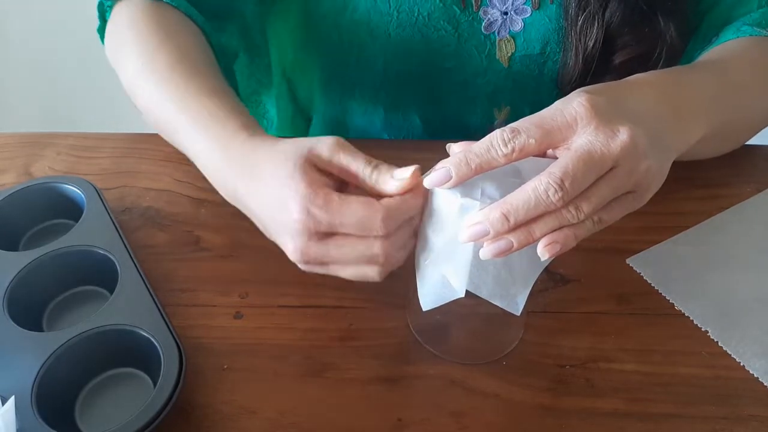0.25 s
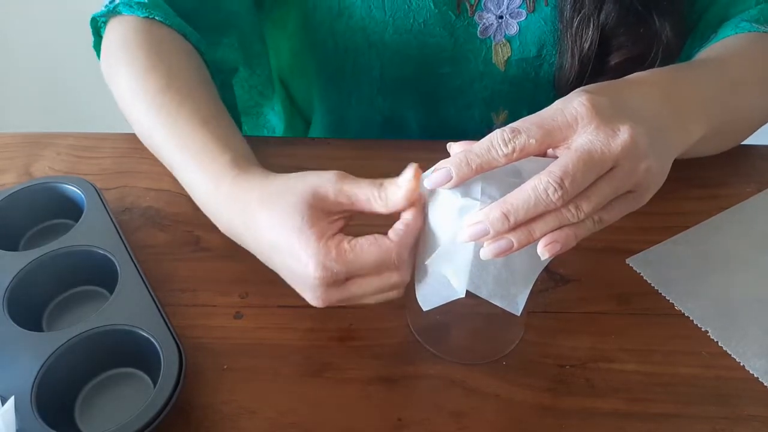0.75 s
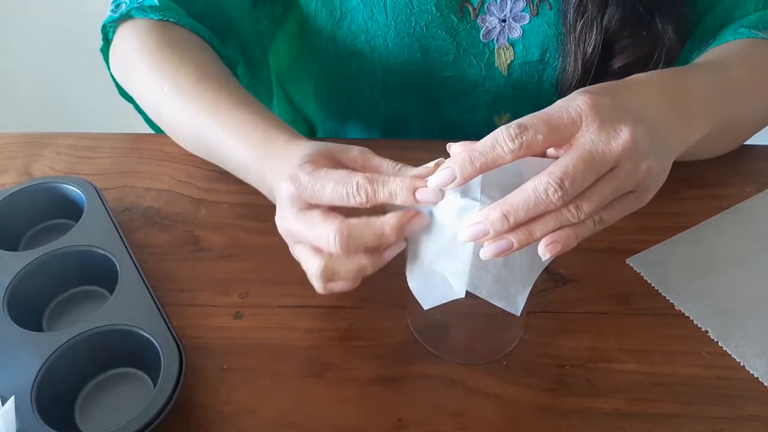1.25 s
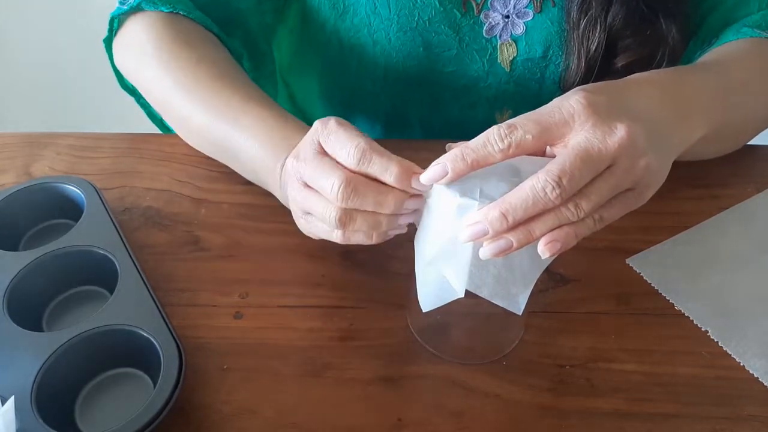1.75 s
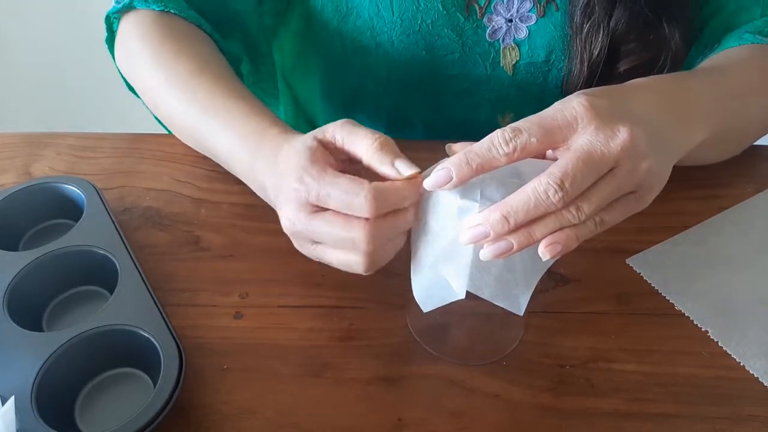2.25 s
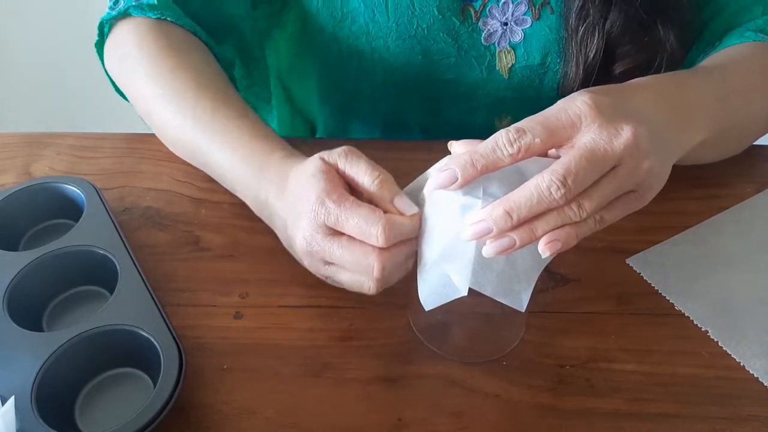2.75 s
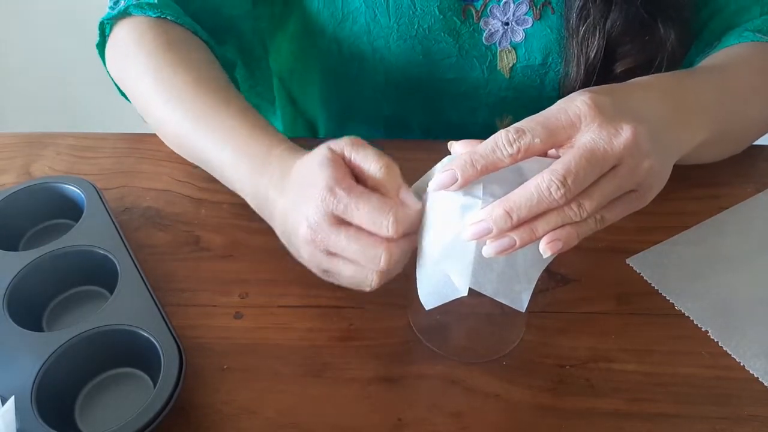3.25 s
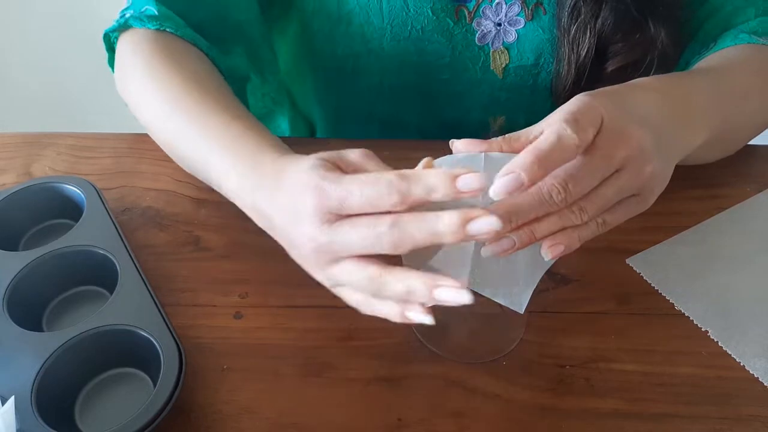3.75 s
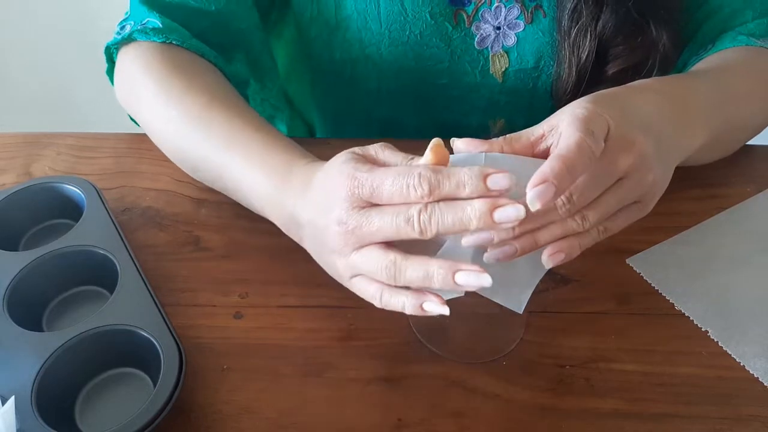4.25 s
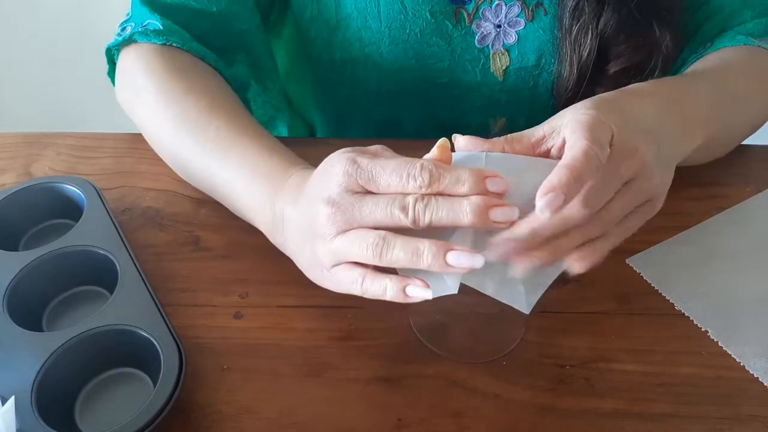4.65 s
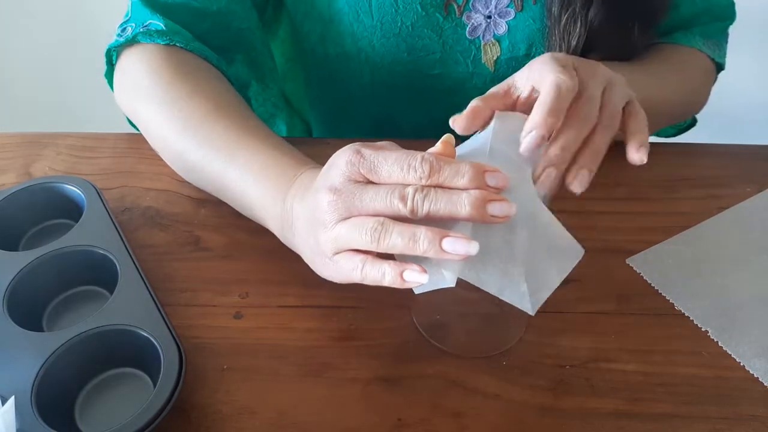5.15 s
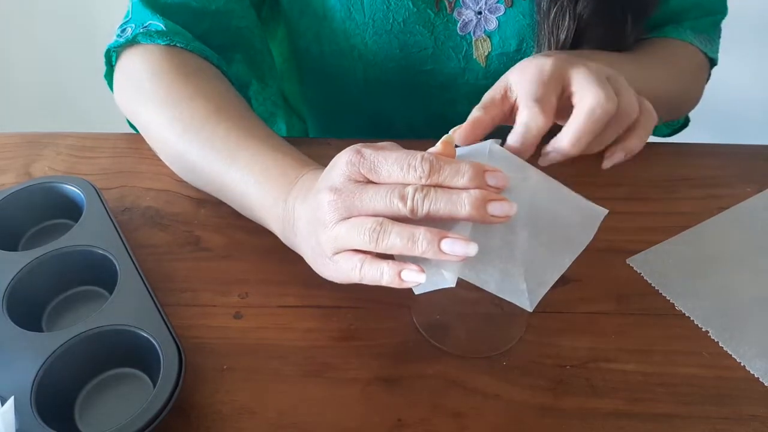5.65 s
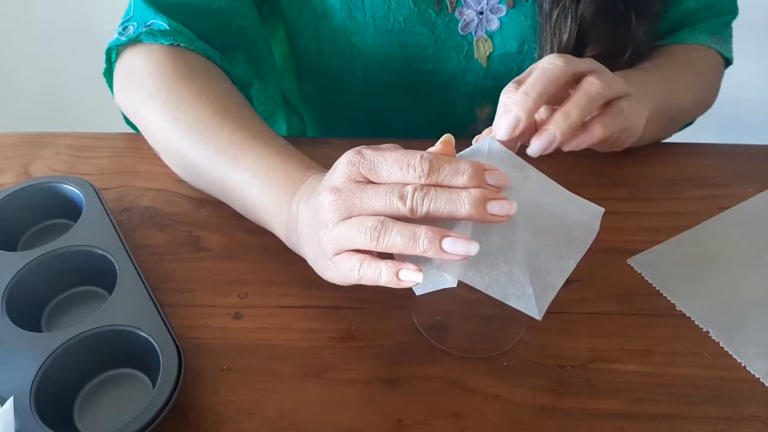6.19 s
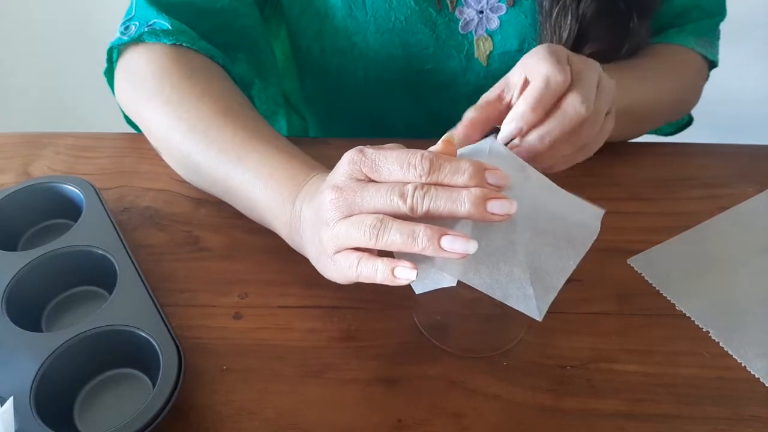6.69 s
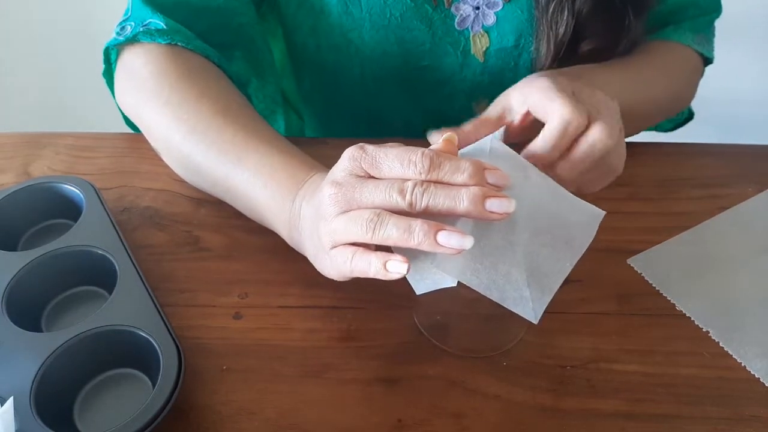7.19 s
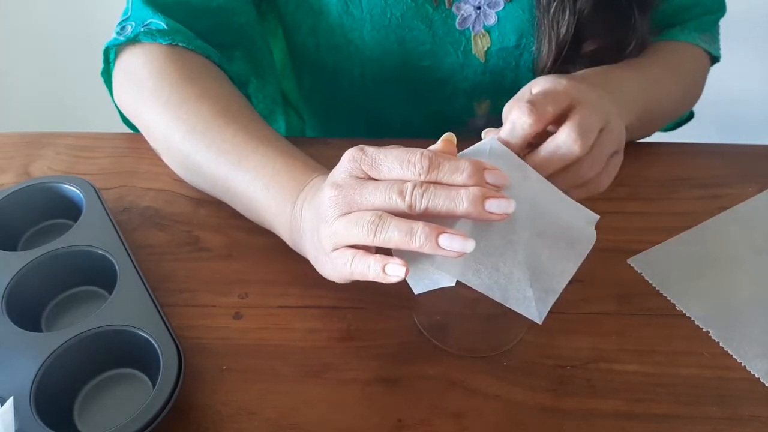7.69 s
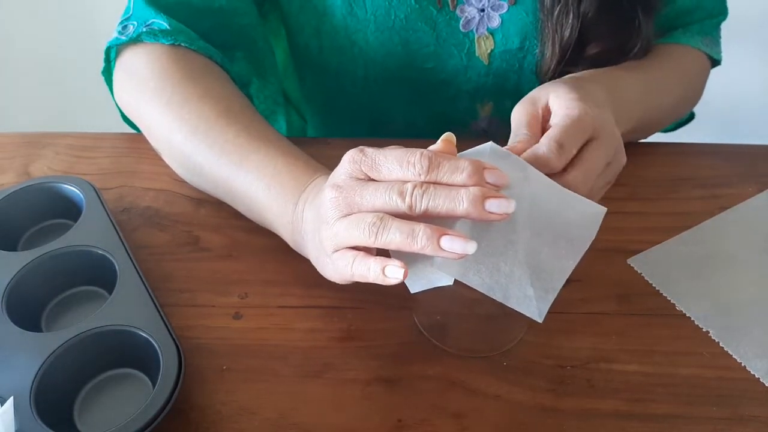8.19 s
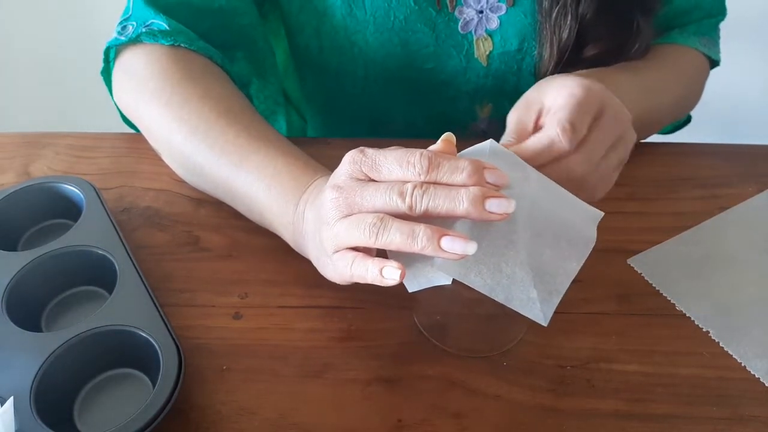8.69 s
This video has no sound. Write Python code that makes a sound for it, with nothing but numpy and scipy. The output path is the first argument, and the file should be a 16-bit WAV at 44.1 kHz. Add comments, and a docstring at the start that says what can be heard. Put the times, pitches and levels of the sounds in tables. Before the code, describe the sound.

Hands pleat baking paper around an upturned glass on a wooden table. Dry creases snap in irregular clusters over fine crackling, briskly at first, then sparser around four to five seconds, then stronger and denser to the end. Two low wooden knocks fall near 3.3 and 4.1 seconds. The room is quiet, hard-walled and briefly reverberant. One microphone hears bright paper in the air; the other, covered against the table, picks up muffled wood.

```python
"""A hard-walled room: hands pleat baking paper round an upturned glass on a wooden table.
Creases snap as ragged noise bursts, the sheet crackles finely in dense clicks, and the room rings after.
Knocks ring the board's modes; rubbing keeps them humming as narrow noise bands.
The left microphone hears the air; the right one lies covered against the table and hears the wood."""
import sys
import numpy as np
from scipy import signal
from scipy.fft import rfft, irfft, next_fast_len
from scipy.io import wavfile
from scipy.ndimage import uniform_filter1d

SR = 44100
rng = np.random.default_rng(int(sys.argv[2]) if len(sys.argv) > 2 else 0)


def pcm_store(signal):
    """Save signal as 16-bit PCM."""
    levels = np.round(np.clip(np.atleast_2d(signal), -1, 1) * 32767)
    wavfile.write(sys.argv[1], SR, levels.astype(np.int16).T)


N = 393813
HOLLOW_DB, HOLLOW_OCTAVES = 10, 0.28  # resonance of the air pocket inside the folded sheet
CONTROL_STEP = 64  # samples between gesture levels


def undb(db):
    """Amplitude of a level in dB."""
    return 10 ** (np.asarray(db) / 20)


def unit(x):
    """Scale to rms 1."""
    return x / np.sqrt(np.mean(x ** 2, axis=-1, keepdims=True))


def shape(table, size):
    """Gain of (hz, db) points at the bins of a transform."""
    hz, db = np.transpose(table)
    bins_hz = np.fft.rfftfreq(size, 1 / SR) + 1
    return undb(np.interp(np.log(bins_hz), np.log(hz), db))


def band(x, lo_hz, hi_hz):
    """Butterworth band-pass."""
    return signal.sosfilt(signal.butter(2, [lo_hz, hi_hz], "band", fs=SR, output="sos"), x)


def hump(f, hz, db, octaves):
    """Gain of a resonance, bell-shaped in octaves."""
    return undb(db * np.exp(-0.5 * (np.log2(f / hz) / octaves) ** 2))


def walk(rate_hz):
    """Random levels held 1 / rate_hz s and slewed; rms 1."""
    hold = int(SR / rate_hz)
    steps = np.repeat(rng.standard_normal(N // hold + 1), hold)
    return unit(uniform_filter1d(steps, hold)[:N])


def noise(table):
    """Steady noise with a (hz, db_per_hz) spectrum."""
    size = next_fast_len(N)
    spectrum = rfft(rng.standard_normal(size)) * shape(table, size)
    return irfft(spectrum, size)[:N] * np.sqrt(SR / 2)


def blend(db, *columns):
    """Overlapping gestures add in power; their settings mix by strength."""
    power = undb(db) ** 2 + 1e-14
    total = power.sum(axis=0)
    return [np.sqrt(total)] + [(power * c).sum(axis=0) / total for c in columns]


def air():
    """Quiet of the room at the open microphone: shaped noise, gently wavering."""
    # hz, level_db_per_hz
    air_spectrum = [(30, -103), (60, -92), (150, -91.5), (250, -101), (450, -107), (620, -103),
                    (1300, -114), (3000, -108), (6500, -108), (8500, -123), (15000, -122)]
    return noise(air_spectrum) * undb(0.25 * walk(2.26))


def hiss():
    """Steady shaped noise of the covered microphone."""
    # hz, level_db_per_hz
    hiss_spectrum = [(30, -122), (60, -116), (150, -112), (300, -113), (600, -119.5), (1200, -124),
                     (2500, -127.5), (7000, -133), (10000, -132), (14000, -126), (16000, -126)]
    return noise(hiss_spectrum)


def pinching():
    """Fingers pinch and draw the sheet: +20 dB over the build-up, -20 dB over the easing."""
    # hardest_s, crackle_db, build_s, ease_s, body_db re crackle, hollow_hz
    pinches = [(0, -51, .05, 0.048, -7.5, 645), (.2, -55, 0.052, 0.037, -22, 635),
               (0.451, -49.5, 0.033, 0.062, -14, 980), (.62, -67, 0.22, 0.18, 6.5, 765),
               (1, -88, .5, .12, -7, 760), (1.39, -49, 0.093, 0.052, -9, 780), (1.6, -61, 0.33, 1, -2, 694),
               (1.86, -56, .2, 0.089, -8, 557), (2.125, -64, 0.45, .09, -20, 590),
               (2.28, -45, 0.042, 0.21, -7, 586), (2.5, -69.5, .2, 0.33, -2, 670),
               (2.825, -59.5, 0.19, 0.065, -5, 780), (3.075, -48.5, 0.42, 0.037, -10, 720),
               (3.325, -48, 0.14, 0.12, -11, 660), (3.475, -56, 0.095, 0.038, 1.5, 730),
               (3.7, -66, 0.056, .05, -5, 580), (3.95, -50.5, 0.032, 0.24, -15, 700),
               (4.2, -67, .4, 0.38, -15, 830), (4.38, -58, .1, 0.88, -2.5, 850),
               (4.68, -56, 0.1, 0.18, -3.5, 860), (4.998, -56, .035, 0.075, -8, 620),
               (5.351, -38, 0.15, 0.083, -2.5, 764), (5.68, -67, 0.24, .3, 3, 670),
               (5.875, -86, .15, 0.037, -12, 870), (6.02, -51, 0.032, 0.56, -7.5, 822),
               (6.28, -40.5, 0.25, 0.094, -7.5, 750), (6.525, -46, 0.19, 0.38, -9, 1100),
               (6.675, -44.5, 0.12, 0.063, 0, 898), (6.9, -49, 0.88, 0.2, -7.5, 824),
               (7.175, -44.5, 0.1, .04, -4.5, 800), (7.34, -61.5, 0.39, 0.76, -5, 880),
               (7.651, -38, 0.12, .12, -10.5, 1050), (7.8, -52.5, 0.31, 0.36, -5.5, 740),
               (8.1, -47.5, 0.36, 0.081, -2.5, 1020), (8.45, -43, 0.037, 0.3, -5, 850),
               (8.7, -50.5, 0.047, 0.15, 0, 850), (8.85, -39.5, 0.11, 0.1, -7.5, 1030)]
    s, db, build_s, ease_s, body_db, hollow_hz = np.transpose(pinches)[:, :, None]
    t = np.arange(0, N, CONTROL_STEP) / SR
    before = (s - t) / np.maximum(build_s, 0.01)
    after = (t - s) / np.maximum(ease_s, 0.01)
    curves = blend(db - 20 * np.maximum(before, after), body_db, hollow_hz)
    return [np.interp(np.arange(N) / SR, t, c) for c in curves]


def parts(size):
    """The paper's colour split into body, middle and sizzle."""
    # hz, level_db_per_hz (relative, microphone included)
    paper_spectrum = [(150, -26), (250, -15.5), (450, -9.5), (830, -8), (1400, -7.5), (2000, -3),
                      (3000, -2.5), (4200, 1), (5200, -2), (6500, 0), (7200, -2), (8600, -18), (12300, -13),
                      (15500, -16.5), (17000, -24.5)]
    f = np.fft.rfftfreq(size, 1 / SR) + 1
    body = 1 / (1 + (f / 1900) ** 4)
    sizzle = 1 / (1 + (8200 / f) ** 12)
    return f, shape(paper_spectrum, size) * np.array([body, 1 - body - sizzle, sizzle])


def crackle(per_s=900, spread_db=3.5, sizzle_db=-11, bunch_db=4.5):
    """Tiny fibres and folds giving way: dense clicks of very uneven size, in bunches."""
    level, body_db, hollow_hz = pinching()
    clicks = (rng.random(N) < per_s / SR) * undb(spread_db * rng.exponential(size=N))
    puffs = signal.lfilter([1], [1, -0.97], clicks) * rng.standard_normal(N)
    puffs *= undb(bunch_db * walk(40))
    size = next_fast_len(N)
    f, colour = parts(size)
    spectrum = rfft(puffs, size)
    middle, sizzle = unit(irfft(spectrum * colour[1:], size)[:, :N])
    # the pocket changes size: fade between four fixed pockets, half an octave apart
    steps = np.arange(4)[:, None]
    hollow = hump(f, 450 * 2 ** (steps / 2), HOLLOW_DB, HOLLOW_OCTAVES)
    pockets = unit(irfft(spectrum * colour[0] * hollow, size)[:, :N])
    fades = np.clip(1 - abs(2 * np.log2(hollow_hz / 450) - steps), 0, 1)
    body = (fades * pockets).sum(axis=0)
    return level * (middle + undb(body_db) * body + undb(sizzle_db) * sizzle)


def lesser_creases(per_s=18, strongest_db=13.5, spread_db=10, body_re_db=-4, sizzle_db=-16.5, fade_ms=1.92):
    """Smaller creases come at random, stronger the harder the pinch; levels re crackle."""
    even = rng.random((int(per_s * N / SR), 4)).T
    bell = rng.standard_normal((even.shape[1], 3)).T
    s = even[0] * (N - 1) / SR
    level, body_db, hollow_hz = (c[(s * SR).astype(int)] for c in pinching())
    return np.transpose([
        s,
        20 * np.log10(level) + strongest_db - spread_db * even[3],
        3000 + 3900 * np.sqrt(even[1]),
        body_db + body_re_db + 4 * bell[1],
        sizzle_db + 5 * bell[2],
        fade_ms * np.exp(0.28 * bell[0]),
        hollow_hz * 1.53 ** (even[2] - 0.5)])


def snaps(size=2048, lead=400, build=0.87, abrupt=1.75, loudest=0.46, peak_db=7.5, octaves=0.25,
          ragged_db=3.0, body_slow=2.4, thin_db_per_db=0.31, usual_body_db=-13, thin_hz=4400):
    """Each crease buckles in a ragged burst of a few ms; its panel size sets the strongest pitch."""
    # clearest creases: start_s, peak_db, strongest_hz, body_db (below 2 kHz, re peak),
    # sizzle_db (above 8 kHz, re peak), fade_ms, hollow_hz
    clear_creases = [(0.0768, -47, 6070, -31, -26, 1.1, 690), (0.1839, -39, 6460, -16.5, -8, 0.41, 480),
                     (0.2135, -39, 7100, -22, -6, 0.3, 620), (0.4161, -31.0, 6470, -19.5, -12, 1.9, 705),
                     (0.497, -41, 6600, -15, -9, 1.4, 690), (0.5387, -39, 6420, -14, -12, 2, 570),
                     (0.5482, -42, 6620, -13, -5, 2, 550), (0.5589, -32, 6210, -38, -8, 0.6, 610),
                     (0.5812, -31, 6580, -36, -3, 0.46, 630), (0.6113, -29.0, 6460, -17, -7.5, 0.98, 870),
                     (0.7095, -40, 3870, -20, -11, 0.47, 480), (0.7853, -43.5, 6060, -13, -9, 0.73, 750),
                     (0.7881, -36, 6030, -17, -11, 0.92, 750), (0.7966, -39, 6380, -22, -17, 0.4, 590),
                     (0.8563, -35.5, 4530, -15, -13, 0.7, 1040), (0.8954, -44.5, 6490, -19, -16, 0.74, 500),
                     (0.9228, -37.0, 5700, -16, -15, 1.3, 740), (0.9676, -34, 3960, -18.5, -7.5, 1.2, 774),
                     (0.9876, -33.5, 5670, -19, -10, 1.1, 560), (1.0418, -49.5, 6150, -20, -5, 3.3, 500),
                     (1.0547, -42, 6850, -13, -9.5, 1.27, 965),
                     (1.2301, -34.5, 5900, -15.5, -11, 0.97, 620), (1.2439, -34.5, 6100, -13, -9, 1.2, 507),
                     (1.2531, -35, 6430, -10.5, -7, 1.6, 850), (1.2804, -38.5, 6820, -8, -11, 1.4, 700),
                     (1.2878, -40.5, 6840, -20, -25, 1.6, 480), (1.3618, -41, 5380, -10, -7, 1.9, 800),
                     (1.3798, -27.5, 5760, -30, -2.5, 2.2, 710), (1.3904, -32.5, 6810, -21, -10, 0.54, 850),
                     (1.3995, -27.5, 5700, -24, -11, 0.8, 800), (1.449, -35, 6920, -32, -11, 0.75, 1420),
                     (1.4925, -28, 5300, -23, -8, 0.87, 480), (1.5422, -32.5, 6880, -31, -11, 0.4, 720),
                     (1.5507, -33.5, 5270, -23, -8.5, 1, 670), (1.6436, -31.5, 6090, -16.5, -10, 0.94, 875),
                     (1.6602, -33, 6500, -24, -7.5, 1.0, 810), (1.6705, -36.5, 2310, -9.5, -17, 0.97, 720),
                     (1.7354, -32.5, 4100, -16, -16, 1.9, 570), (1.7512, -31, 5900, -14, -13, 1.1, 510),
                     (1.7638, -35, 5660, -35, -19, 1.4, 660), (1.7706, -27.5, 6440, -16, -10.5, 1, 550),
                     (1.7803, -35.5, 3070, -14, -11, 3.9, 1230), (1.8415, -23, 5760, -26, -8.5, 0.68, 670),
                     (1.8536, -32.0, 5460, -18, -12, 0.89, 600), (1.9166, -32.5, 5260, -7, -6, 0.76, 1500),
                     (2.0776, -43, 6490, -29, -26, 0.9, 660), (2.0901, -41, 5140, -18, -5, 1.7, 800),
                     (2.1049, -38.5, 5240, -15, -11, 2.1, 1340), (2.1208, -38, 5140, -11.5, -8, 1.3, 557),
                     (2.1403, -33.5, 6200, -11, -14, 1.2, 1400), (2.1791, -34, 6910, -14, -5.5, 0.67, 605),
                     (2.2559, -30, 3900, -29, -7, 0.57, 690), (2.2825, -28.5, 4270, -17, -3.5, 1, 650),
                     (2.3005, -37, 5340, -18, -10, 1.4, 580), (2.3086, -27.5, 5400, -23, -6.5, 1.1, 550),
                     (2.3407, -23.5, 5750, -17, -14, 1.4, 627), (2.3844, -35, 6360, -20, -4, 0.4, 710),
                     (2.428, -28.5, 5450, -21, -16, 0.92, 850), (2.5054, -40, 6220, -18, -23, 0.98, 687),
                     (2.5133, -41, 5560, -29, 2, 0.71, 890), (2.5898, -45.5, 3360, -15, -10, 1.9, 800),
                     (2.7217, -47.5, 4200, -24, -23, 1, 670), (2.8111, -43, 4310, -6, -10, 0.88, 740),
                     (2.8229, -32.5, 5500, -15.5, -4.5, 1.1, 510), (2.9018, -42, 4900, -29, -21, 0.9, 860),
                     (2.9735, -37.5, 5030, -21, -10, 0.38, 730), (2.9822, -35, 3970, -13, -5.5, 1.5, 1030),
                     (3.0338, -33, 5300, -9, -4, 0.23, 830), (3.0512, -33.5, 6660, -28, -4, 1.4, 880),
                     (3.0704, -27, 6640, -12.5, -12, 1.2, 740), (3.0761, -24.5, 4460, -11.5, -9, 1.6, 626),
                     (3.1025, -26.5, 6400, -38, -16, 0.28, 1000), (3.1166, -31, 6400, -28, -4, 1.1, 510),
                     (3.1764, -33, 6480, -18, -13, 0.85, 615), (3.1961, -38, 5220, -21, -15, 1.2, 830),
                     (3.2036, -36, 6900, -17.5, -5.5, 1.05, 560), (3.2335, -40, 6370, -16, -5, 0.8, 1240),
                     (3.2596, -32.0, 6490, -17, -7.5, 0.86, 810), (3.3438, -37.5, 6710, -6, -6, 2.2, 610),
                     (3.4542, -40, 3620, -2, -23, 0.37, 730), (3.4604, -35.5, 6380, -14, -16, 0.8, 690),
                     (3.4812, -30, 6040, -11, -8.5, 0.71, 830), (3.6621, -28, 6600, -26, -22, 1.35, 547),
                     (3.9149, -43, 4040, -15, -9, 3.4, 950), (3.9302, -45, 5050, -25.5, -11, 1.2, 660),
                     (3.9405, -30, 5600, -21, -11.5, 0.8, 477), (3.9553, -40, 6570, -12.5, -22, 2.1, 690),
                     (4.0204, -42, 3560, -11, -12, 1.3, 620), (4.059, -38.5, 3570, -17, -14, 0.54, 710),
                     (4.085, -41.5, 6210, -2.5, -16, 1.7, 1420), (4.1529, -46.5, 6180, -24, -10, 1.4, 1450),
                     (4.1773, -41.5, 6050, -18, -10, 0.72, 720), (4.3304, -36.5, 3850, -12, -14, 0.4, 860),
                     (4.3396, -33, 6450, -26, -13.5, 1, 990), (4.3818, -35.5, 6590, -13, -11, 0.24, 1350),
                     (4.3867, -31.5, 3800, -17, -14, 1.1, 1310),
                     (4.4166, -40.0, 3530, -13.5, -4.5, 2.4, 610),
                     (4.4795, -36, 5850, -12.5, -12, 2.3, 1070), (4.5004, -31.5, 2400, -9, -15, 2.14, 880),
                     (4.5295, -32.5, 5950, -12, -12, 1.8, 920), (4.5352, -31.5, 4500, -31, -14, 1.0, 860),
                     (4.6089, -43, 4800, -28, -11, 2.3, 1140), (4.6637, -36, 6530, -21, -29.5, 1.27, 830),
                     (4.6712, -38, 6100, -45, -4.5, 0.55, 680), (4.9776, -33.5, 5840, -9.5, -17, 1.9, 620),
                     (5.1383, -37.5, 6690, -11, -24, 4.1, 565), (5.1524, -33.5, 3740, -6.5, -19, 1.46, 890),
                     (5.2086, -31.5, 6100, -7.5, -20, 0.39, 607), (5.2294, -32, 2940, -10, -17, 1, 1500),
                     (5.311, -35, 4320, -14, -26, 1.6, 710), (5.3231, -38.5, 5470, -3, -23, 3, 870),
                     (5.3498, -26.5, 5870, -6.5, -11.5, 2, 850),
                     (5.5388, -35.5, 4760, -24, -13.5, 1.34, 530), (5.672, -46.5, 3070, -13, -35, 1.0, 480),
                     (5.6892, -52.5, 3060, 0, -25, 2.5, 580), (5.7547, -43.0, 4900, -7, -36, 1.6, 577),
                     (5.7597, -44.5, 4330, -13, -29, 2.5, 600), (5.978, -34.5, 6140, -33, -19, 1.2, 590),
                     (5.9954, -40.5, 2980, -10.5, -25, 3.4, 1220), (6.0071, -30, 6200, -22, -15, 0.83, 870),
                     (6.0904, -40.5, 6970, -17, -14, 3.6, 910), (6.0995, -35, 4230, -6.5, -16, 2.8, 800),
                     (6.1466, -36.5, 5960, -4, -9, 2.7, 850), (6.1676, -32.5, 6500, -8, -15, 1.8, 556),
                     (6.1759, -21, 4450, -14, -7.5, 0.65, 810), (6.1953, -34.5, 4630, -7, -19, 1.5, 800),
                     (6.2338, -25.0, 5150, -12.5, -14, 3.3, 620), (6.239, -24.5, 6000, -15, -9, 3.2, 610),
                     (6.3019, -35.5, 6790, -18, -19, 1.5, 660), (6.3394, -39.5, 3000, -8.5, -24, 3.2, 1130),
                     (6.4286, -37, 6590, -12, -12, 1.4, 660), (6.4761, -41, 5470, -9, -23, 1.8, 1260),
                     (6.4897, -37, 2950, -15, -24, 0.72, 580), (6.5293, -33, 5900, -14, -9, 4.2, 970),
                     (6.5344, -29.5, 2764, -10, -7, 1.7, 840), (6.5484, -32, 3130, -24, -10, 3.2, 1170),
                     (6.6124, -35.5, 4450, -14, -18, 3.9, 530), (6.6607, -24.5, 6180, -19, -14, 1.9, 920),
                     (6.6797, -22, 6000, -12, -14, 1.63, 890), (6.7827, -32, 6850, -11, -11, 2.8, 1130),
                     (6.8097, -37, 6380, -7, -16, 1.7, 920), (6.8254, -25.5, 4670, -18, -21, 0.61, 950),
                     (6.8297, -33, 3900, -14, -21, 1.6, 920), (6.8624, -30, 4780, -16, -11, 1.7, 860),
                     (6.8889, -29, 6050, -14, -7, 1.9, 880), (6.9516, -38.5, 6970, -5.5, -20, 1.1, 700),
                     (6.9862, -41, 3840, -18, -27, 1, 740), (7.0221, -41, 4530, -19, -23, 0.8, 520),
                     (7.0589, -32.5, 6500, -32.5, -22, 0.93, 620),
                     (7.0826, -21, 6150, -27, -14.5, 0.58, 590), (7.1005, -28, 4290, -19, -25, 1, 620),
                     (7.1052, -35.5, 6120, -23, -9, 1.1, 720), (7.1545, -32.5, 2550, -16, -27, 2.5, 570),
                     (7.1712, -39, 6280, -11, -32, 3.5, 1190), (7.3234, -43, 3000, -12, -30, 2.7, 890),
                     (7.5434, -50, 4230, -19, -22, 1.4, 870), (7.5641, -34.5, 6360, -16, -10, 1.7, 1050),
                     (7.5664, -34.5, 3900, -24, -21, 2.6, 1050), (7.6035, -35, 6230, -9, -23, 4.3, 1060),
                     (7.636, -33, 4900, -11, -16, 1.2, 690), (7.6461, -28, 4030, -17, -16, 1.0, 860),
                     (7.6499, -29, 4760, -9, -6, 3.7, 860), (7.6604, -24.5, 6100, -14, -11, 0.87, 700),
                     (7.7015, -35.5, 4570, -12, -22, 2.5, 630), (7.7357, -36, 3640, -9, -25, 2.7, 1300),
                     (7.7717, -35.5, 6470, -8.5, -16, 0.96, 840), (7.796, -32.5, 5330, -17, -16, 1.0, 710),
                     (7.8166, -32.5, 5910, -24, -11, 0.4, 710), (7.8964, -33.0, 5770, -25, -16.5, 1.3, 980),
                     (7.9257, -40, 5530, -21, 0, 3, 1040), (7.9288, -30.5, 5850, -15.5, -6, 2.9, 1050),
                     (7.9471, -23, 6300, -22, -7.5, 1, 740), (7.9892, -34.5, 6050, -25, -21, 1.1, 730),
                     (8.0149, -32, 6180, -11.5, -14, 2.6, 730), (8.0365, -32.5, 6040, -14, -12, 2.2, 750),
                     (8.075, -33.0, 4080, -8.5, -24, 1.4, 920), (8.0808, -32.5, 3240, -18, -14, 1.7, 730),
                     (8.1022, -35.5, 6860, -15, -4, 2.6, 596), (8.3423, -39.5, 6500, -24, -40, 0.64, 720),
                     (8.3845, -38.0, 6460, -6, -28, 1.9, 870), (8.4059, -31.5, 6150, -19, -13, 1.6, 840),
                     (8.4166, -35, 2800, -13, -17, 1.9, 980), (8.4376, -29.5, 4000, -14, -15, 0.83, 640),
                     (8.4497, -24, 6170, -14.5, -10.5, 3, 590), (8.4869, -32.5, 2920, -5, -19.5, 2, 845),
                     (8.5181, -38, 3700, -11, -23, 2.2, 970), (8.5313, -35, 3270, -6, -23, 2.0, 1160),
                     (8.5625, -26.5, 6300, -13.5, -20, 0.67, 660),
                     (8.6083, -33.5, 6590, -12, -11, 0.76, 810),
                     (8.6722, -20.5, 5840, -22, -16, 0.63, 1500),
                     (8.7037, -33.5, 6500, -12.5, -15, 1.9, 830),
                     (8.7975, -28.0, 6300, -22.5, -20, 1.5, 850), (8.8057, -29, 4640, -18, -22, 1.2, 1254),
                     (8.8274, -26, 4730, -16, -11.5, 3.6, 786), (8.8362, -27.5, 3920, -17, -16, 1.3, 1124),
                     (8.9112, -35.5, 6040, -8, -19, 1.4, 513)]
    creases = np.vstack([clear_creases, lesser_creases()])
    s, db, hz, body_db, sizzle_db, fade_ms, hollow_hz = creases.T[:, :, None]
    ms = (np.arange(size) - lead) * 1000 / SR
    chance = rng.standard_normal((len(s), 2, size))
    ragged = undb(ragged_db * unit(uniform_filter1d(chance[:, 1], 16)))
    f, colour = parts(size)
    hollow = hump(f, hollow_hz, HOLLOW_DB, HOLLOW_OCTAVES)
    # creases with little body are also thin in the octave above it
    thin_db = thin_db_per_db * (body_db - usual_body_db)
    thin = undb(thin_db * np.clip(np.log2(thin_hz / f), 0, 1))
    gains = colour[0] * hollow, colour[1] * thin * hump(f, hz, peak_db, octaves), colour[2]
    # long creases take longer to get going; all stop abruptly
    late = ms / np.clip(fade_ms, 0.3, 8) - loudest
    bursts = 0
    for gain, part_db, slow in zip(gains, (body_db, 0, sizzle_db), (body_slow, 1, 1)):
        envelope = np.exp(np.where(late < 0, late / build, -(abs(late) / slow) ** abrupt))
        burst = irfft(rfft(chance[:, 0] * ragged * envelope) * gain, size)
        # level is that of the loudest millisecond
        top = np.sqrt(uniform_filter1d(burst ** 2, 44).max(axis=1, keepdims=True))
        bursts = bursts + burst / top * undb(db + part_db)
    out = np.zeros(N + 2 * size)
    at = (s * SR).astype(int)
    np.add.at(out, at + size - lead + np.arange(size), bursts)
    return out[size:size + N]


def room(x, places=4, tail_db=-5, early_db=-5.5):
    """Direct sound, early echoes from table and hands, then a dense tail that fades band by band.
    The sheet keeps moving, so each moment reaches the walls from another place."""
    # hz, t60_s, level_db
    tail_bands = [(358, 0.29, 4), (744, 0.33, 2.5), (1505, 0.36, 2), (2860, 0.4, 1), (5400, 0.41, -1.5),
                  (12300, 0.26, 0.5)]
    t = np.arange(SR // 2) / SR
    place = np.repeat(rng.integers(places, size=N // 256 + 1), 256)[:N]
    out = x.copy()
    for k in range(places):
        tail = 0
        for hz, t60_s, db in tail_bands:
            ringing = band(rng.standard_normal(len(t)), hz / 1.41, hz * 1.243)
            tail = tail + undb(db) * ringing * 10 ** (-3 * t / t60_s)
        tail *= 1 - np.exp(-(t / 0.0047) ** 2)  # the walls answer after a few ms
        early = (rng.random(len(t)) < 0.03) * rng.standard_normal(len(t)) * np.exp(-t / 0.0034)
        response = undb(tail_db) * tail / np.linalg.norm(tail)
        response += undb(early_db) * early / np.linalg.norm(early)
        out += signal.fftconvolve(x * (place == k), response)[:N]
    return out


def rubbing(rise_db_s=420, fall_db_s=332, resting_db=-90, scrape_db=-9):
    """Glass and wrists rub on the wood: uneven friction keeps two board modes humming."""
    # start_s, length_s, upper_db (290 Hz mode), lower_db (150 Hz mode re upper)
    rubs = [(0, 0.022, -77, -4), (0.196, 0.027, -75, -4), (0.517, 0.078, -82, 5), (0.704, .03, -76.5, 12),
            (.93, .03, -76, -3), (1.388, 0.042, -52.5, -7), (1.515, 0.1, -57, -6.5),
            (1.747, 0.18, -65.5, -7), (2.282, .02, -66, 2), (2.41, .02, -65, -5), (2.5, .16, -75, 3),
            (3.1, .04, -71, -10), (3.366, .04, -77, 1), (4.65, .03, -86, -1), (5.01, 0.025, -68.5, 10.5),
            (5.33, .02, -70, -24), (6.14, 0.18, -87.5, 10), (6.375, 0.04, -61.5, 4.5), (6.56, .04, -80, 0),
            (6.96, 0.036, -75, 1), (7.42, .03, -76, -4), (7.59, .03, -70, -14), (7.69, .03, -63.5, -6),
            (7.9, .2, -78, -3), (8.433, .12, -83, -4), (8.853, .1, -65, -9)]
    s, length_s, db, lower_db = np.transpose(rubs)[:, :, None]
    t = np.arange(0, N, CONTROL_STEP) / SR
    away_db = np.maximum(rise_db_s * (s - t), fall_db_s * (t - s - length_s))
    curves = blend(db - np.maximum(0, away_db), lower_db)
    upper, lower_db = (np.interp(np.arange(N) / SR, t, c) for c in curves)
    resting = undb(resting_db + 2.7 * walk(12))  # the arms never lie quite still
    drive = rng.standard_normal((2, N)) * undb(1.5 * walk(25))
    hums = np.array([band(drive[0], 278.0, 298.7), band(drive[1], 124, 230)])
    # level the hum over 50 ms, so that the rub table sets its loudness
    hums /= np.sqrt(uniform_filter1d(hums ** 2, SR // 20) + 1e-12)
    scrape = undb(scrape_db) * unit(band(band(drive[0], 200, 470), 200, 470))
    return (upper + resting) * (hums[0] + scrape) + (upper * undb(lower_db) + resting) * hums[1]


def knocks(rattle_db=-42, rattle_s=0.029, edge_db=-6, edge_ms=0.16):
    """A short push jerks the board and rings its modes; the top rocks the other way; loose things rattle after."""
    # knocks through the table: start_s, peak_db, contact_ms
    blows = [(0.4793, -40.5, 0.11), (0.958, -53, 0.13), (1.7187, -34.5, 0.12), (2.3878, -50, 0.46),
             (3.3084, -23.5, .15), (3.3119, -18.5, 0.22), (4.0635, -16, 0.18), (4.618, -59, 2.8),
             (4.7237, -53, 0.24), (6.4056, -39, 0.18), (6.428, -42, 0.33), (6.8676, -36.5, 1.56),
             (6.9235, -33.5, .2), (7.4514, -52, 0.94), (7.555, -44, 0.14), (8.6086, -52, 0.28)]
    # bending modes: hz, level_db, t60_s
    board_modes = [(278, -4, 0.013), (287, -6.5, 0.044), (143, 0, 0.032)]
    # table top rocking back on its legs: hz, level_db, t60_s
    bounce = (63, -4, 0.064)

    def mode(hz, db, t60_s):
        """Decaying cosine of one resonance."""
        return undb(db) * np.cos(2 * np.pi * hz * t) * 10 ** (-3 * t / t60_s)

    t = np.arange(SR // 5) / SR
    ring = sum(mode(*m) for m in board_modes) - mode(*bounce)
    ring += undb(edge_db) * np.exp(-1000 * t / edge_ms)
    out = np.zeros(N + SR)
    for s, db, contact_ms in blows:
        # contact is about the width of the push at half height
        push = np.hanning(int(max(contact_ms, 0.05) * SR / 500) + 3)
        rattle = unit(band(rng.standard_normal(len(t)), 400, 2700)) * np.exp(-t / rattle_s)
        blow = np.convolve(push, ring)[:len(t)]
        start = int(s * SR) - len(push) // 2
        out[start:start + len(t)] += undb(db) * (blow / blow.max() + undb(rattle_db) * rattle)
    return signal.lfilter(*signal.butter(2, 45, "high", fs=SR), out)[:N]


def leak(echoes, level_db=-25, lowpass_hz=500):
    """Room's share of the paper at the covered side, muffled and scattered on its way round."""
    detour = rng.standard_normal(SR // 20) / np.sqrt(SR // 20)
    scattered = signal.fftconvolve(band(echoes, 400, 5600), detour)[:N]
    return undb(level_db) * signal.lfilter(*signal.butter(1, lowpass_hz, fs=SR), scattered)


def scene():
    """Left: paper in the room, air, a trace of wood. Right: wood, leaked paper, hiss."""
    direct = snaps() + crackle()
    paper = room(direct)
    wood = knocks() + rubbing()
    leaked = leak(paper - direct)
    left = paper + air() + undb(-45) * wood
    right = wood + leaked + hiss()
    return np.array([left, right])


def record(dry):
    """The recorder cuts the top: steep low-pass at 15.85 kHz."""
    return signal.sosfilt(signal.ellip(8, 0.2, 60, 15850, fs=SR, output="sos"), dry)


dry = scene()
out = record(dry)
pcm_store(out)
```